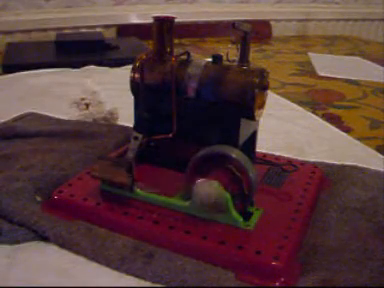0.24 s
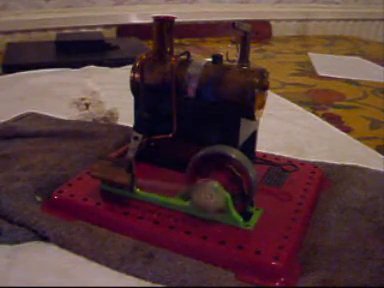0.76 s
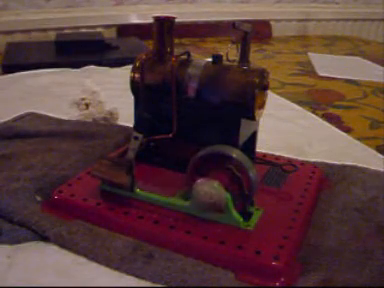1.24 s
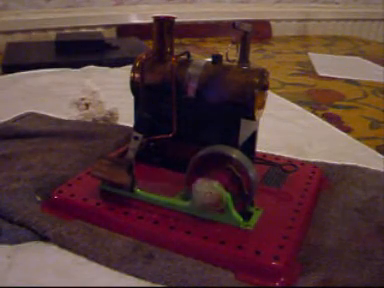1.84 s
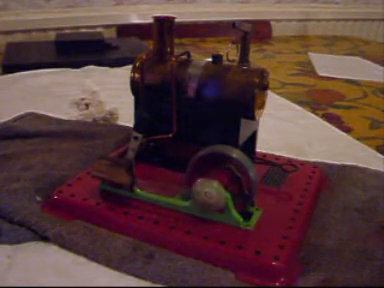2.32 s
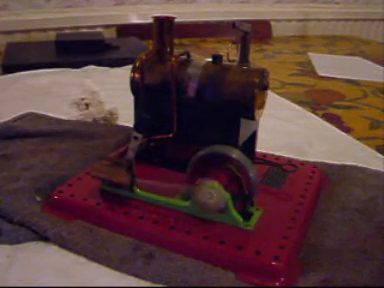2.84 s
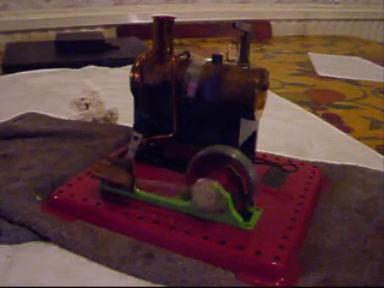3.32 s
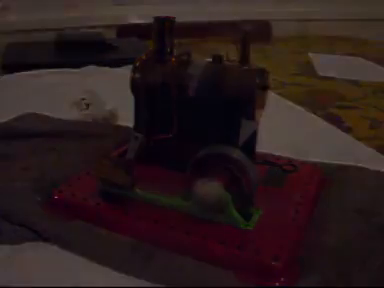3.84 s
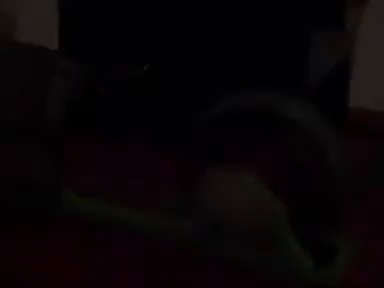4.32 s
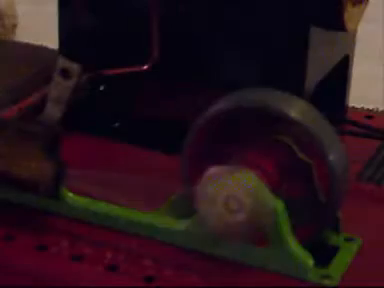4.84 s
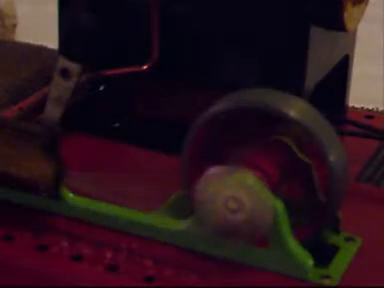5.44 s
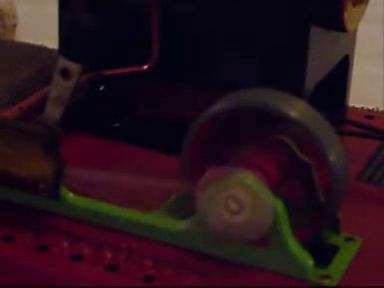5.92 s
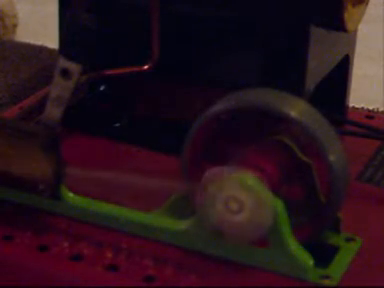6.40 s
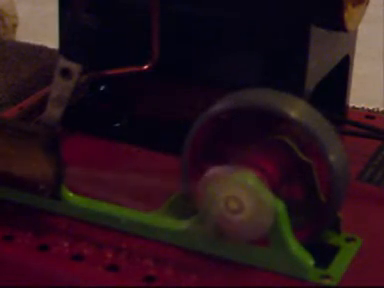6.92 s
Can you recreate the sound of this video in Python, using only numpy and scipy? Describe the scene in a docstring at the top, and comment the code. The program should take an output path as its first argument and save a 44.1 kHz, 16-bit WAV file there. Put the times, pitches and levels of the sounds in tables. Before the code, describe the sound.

Rapid metallic rattling and pulsing steam from a model engine indoors, gathering speed, fading out, then returning close up with a brighter, humming whirr.

```python
"""A toy steam engine with an oscillating cylinder runs on its tin base on a table in a living room.
First, from a step away, it gathers speed from 20 to 29 turns a second and fades out.
Then it fades in again close up, quickening from 35 to 36 turns a second.
On every turn filtered clicks make the knocks and piston ticks, sparse random touches make the rattle,
and gated noise makes the puffs, leak and spit of steam; the frame drones and the room rumbles beneath."""
import sys
import numpy as np
from scipy import signal
from scipy.fft import rfft, irfft, next_fast_len
from scipy.io import wavfile

SR = 44100
rng = np.random.default_rng(int(sys.argv[2]) if len(sys.argv) > 2 else 0)


def to_wav(s):
    """Save 16-bit WAV."""
    ch = np.atleast_2d(s).T  # columns
    pcm = np.round(np.clip(ch, -1, 1) * 32767)  # PCM
    wavfile.write(sys.argv[1], SR, pcm.astype(np.int16))


N = 316197
SECOND_RUN_S = 4.32
# how far play in the joints stretches scatter and rattle at steady speed (factor)
STEADY_SLACK = 0.48

# Ringing of the base plate, frame and boiler.
# Each row: frequency in Hz, width in Hz, lift in dB (negative for a dip).
METAL_MODES = [(141.5, 3.6, 5), (207, 26, 7.5), (235, 5.6, 9), (314.6, 5.5, 13.5), (388.4, 9.9, 7),
               (439, 21, 3.5), (473, 4.8, 7.5), (535.5, 31, 7.5), (696, 73, 10.5), (841, 18, 6.5),
               (916, 18, -6), (1257, 18, 4), (1230, 55, 7), (1390, 30, 6), (1720, 31, 3.5), (1705, 33, -6),
               (1982, 39, 7.5), (2098, 87, 4.5), (2458, 62, 5), (2730, 35, 4), (3046, 78, 6),
               (3420, 50, 4.5), (3720, 40, -2), (3797, 50, 6.5), (4030, 48, -10), (4007, 78, 7.5),
               (4130, 39, 4), (4574, 73, 6), (5197, 65, 12.5), (5800, 380, -5.5), (6580, 40, -18.5)]


def from_db(db):
    """Decibels to gain."""
    return 10 ** (np.asarray(db) / 20)


def rms_one(x):
    """Scale to unit power."""
    return x / np.sqrt(np.mean(x ** 2) + 1e-20)


def colour(x, spectrum):
    """Causal (minimum-phase) filter with a broad spectrum, its phase derived from the cepstrum."""
    size = next_fast_len(len(x) + 4096, real=True)
    hz, db = np.transpose(spectrum)
    bins_hz = np.fft.rfftfreq(size, 1 / SR)
    log_gain = np.log(from_db(np.interp(np.log(bins_hz + 1), np.log(hz), db)))
    cepstrum = irfft(log_gain, size)[:size // 2]
    cepstrum[1:] *= 2
    response = np.exp(rfft(cepstrum, size))
    return irfft(rfft(x, size) * response, size)[:len(x)]


def band(x, hz, width):
    """One resonance with unit gain at its peak."""
    return signal.lfilter(*signal.iirpeak(hz, hz / width, fs=SR), x)


def resonate(x, peaks):
    """A chain of resonances, each lifting or dipping its own band."""
    sections = []
    for hz, width, lift_db in peaks:
        r = np.exp(-np.pi * width / SR)
        poles = np.array([1, -2 * r * np.cos(2 * np.pi * hz / SR), r * r])
        added_band = (1 - r * r) / 2 * np.array([1, 0, -1])
        zeros = poles + (from_db(lift_db) - 1) * added_band
        sections.append(np.r_[zeros, poles])
    return signal.sosfilt(sections, x + 1e-18)


def shimmer(x, peaks, vary_db, changes_per_s):
    """The same chain of resonances, struck in ever different places: each lift rises and falls on its own."""
    when = np.arange(len(x)) / SR * changes_per_s
    for hz, width, lift_db in peaks:
        chance = rng.standard_normal(400)
        wander = np.interp(when, np.arange(len(chance)), chance)
        lift = from_db(lift_db + vary_db * wander)
        x = x + (lift - 1) * band(x + 1e-18, hz, width)
    return x


def disperse(x, delay_s):
    """Bending waves cross the plate, treble first (delay_s at 1 kHz): a click becomes a short chirp."""
    size = next_fast_len(len(x) + 4096, real=True)
    hz = np.fft.rfftfreq(size, 1 / SR)
    # this phase gives a delay that falls as the root of frequency
    phase_turns = 2 * delay_s * np.sqrt(1000 * hz)
    return irfft(rfft(x, size) * np.exp(-2j * np.pi * phase_turns), size)[:len(x)]


def crank(speed, start_angle):
    """Turns done at each moment: the running sum of speed in turns per second."""
    return start_angle + np.cumsum(speed) / SR


def strikes(turns, angle, level_db, scatter_s, uneven_db):
    """One click a turn at a crank angle, never quite equal in time or strength."""
    n = len(turns)
    marks = np.arange(-1, turns[-1] + 1) + angle
    due = np.searchsorted(turns, marks)
    early, strong = rng.standard_normal((len(marks), 2)).T
    scatter = np.interp(marks, turns, scatter_s * np.ones(n))
    at = np.round(due + scatter * early * SR).astype(int)
    inside = (due > 0) & (due < n) & (at >= 0) & (at < n)
    level_db = np.interp(marks, turns, level_db * np.ones(n))
    strength = from_db(level_db + uneven_db * strong)
    return np.bincount(at[inside], strength[inside], n)


def warming(t):
    """From a step away, the engine gathers speed; the harder it pulls, the louder and looser it clatters."""
    # Contacts within one turn. Each row: crank angle in turns, relative knock level in dB,
    # relative rattle level in dB, rattle decay in seconds at a slack of one.
    contacts = [(-.049, -2, -1.5, 0.0032), (0, -2, -11, 0.0035), (.035, -7.5, -8.5, 0.0028),
                (0.099, -17.5, -4.5, .001), (.234, -18, -11.5, 0.0017), (0.347, -22, -11, 0.003),
                (0.408, -20.5, -8, 0.0019), (0.623, -9.5, -9.5, .0019), (.663, -13, -5, 0.0057),
                (0.794, -13.5, -20, 0.0033)]
    # Piston ticks and bounces. Each row: crank angle in turns, relative level in dB.
    tick_hits = [(-.044, 0), (.045, -6), (.1, -7), (.67, -12)]
    # Puffs of steam. Each row: crank angle in turns, relative level in dB, rise in turns, fall in turns.
    puffs = [(-.1, 0, 0.054, 0.067), (-.022, 8.5, 0.027, 0.029), (.06, 2.5, 0.066, 0.083),
             (.125, 0, 0.027, 0.042), (.3, -1.5, 0.05, 0.022), (.41, 0, .06, 0.029),
             (.679, 7, 0.062, 0.049)]
    # Mix of knock, rattle and steam, one row for each: level in dB,
    # dB more per turn/s^2 of pick-up, dB lost per second as the pressure sinks.
    layer_levels = [(-31.5, 1.1245, 1.94), (-25, 0.1346, 0.52), (-28.5, 0.56, -0.17)]
    # Swell and ease of knock, rattle and steam together. Each row: time in seconds, change in dB.
    swell = [(0, 2.5), (.1, -3.5), (.22, -1.8), (.45, -1.9), (.68, 0.3), (.88, -1.4), (1.25, -0.55),
             (1.75, 1.2), (2.05, 0.2), (2.25, 1.5), (2.6, 0), (3.4, -0.6), (3.8, 0)]
    # Broad colour of knocks from afar. Each row: frequency in Hz, relative level in dB.
    far_colour = [(40, -39), (100, -29.5), (200, -12.5), (320, -6), (430, -7), (550, -8.5), (720, 1.5),
                  (920, -6), (1250, -9), (1600, -13), (2100, -9), (3200, -20), (7000, -31)]

    # the flywheel gathers speed along an S-curve, then creeps on (turns per s)
    start_speed, settled_speed, creep_per_s = 20.3893, 27.8646, .2376
    spin_up_s, spin_up_shape = .7076, 1.5007
    lacking = np.exp(-(t / spin_up_s) ** spin_up_shape)
    speed = settled_speed - (settled_speed - start_speed) * lacking + creep_per_s * t
    turns = crank(speed, start_angle=-.21)

    # the joints feel a change of pick-up 27 ms later
    pickup = np.interp(t - .027, t, np.gradient(speed) * SR)
    slack = STEADY_SLACK + .19 * pickup
    swell_db = np.interp(t, *np.transpose(swell))
    knock_db, rattle_db, steam_db = (db + pull * pickup - sag * t + swell_db
                                     for db, pull, sag in layer_levels)

    thump = from_db(knock_db) * knocks(turns, slack, contacts, far_colour, scatter_s=.00008, uneven_db=1.1)
    clatter = from_db(rattle_db) * rattle(turns, slack, contacts, scatter_s=.0002, uneven_db=.9,
                                          rub_db=-13.5, touches_per_s=22000)
    hiss = from_db(steam_db) * steam(turns, puffs, uneven_db=.7, wander_turns=.006)
    piston = from_db(-29.3) * ticks(t, turns, tick_hits, scatter_s=.0001, uneven_db=1.6)
    port = from_db(-37.5) * spits(turns, angle=-.08, length=.045, uneven_db=4)
    return room(thump + clatter + hiss + piston + port) + drone(turns, speed, near=False)


def racing(t):
    """Close up and faster, it runs more evenly, rattles more thinly and drones."""
    # Contacts within one turn. Each row: crank angle in turns, relative knock level in dB before the spurt,
    # relative rattle level in dB, rattle decay in seconds at a slack of one.
    contacts = [(-.06, 4, -7, .0017), (0.023, -5.5, -6, .002), (.072, 4, -9.5, .0012),
                (0.198, -6, -20, .002), (0.353, -3, -11, .001), (.4, -25.5, -16, .001),
                (.583, -7, -11, .002), (0.661, -.5, -15, .0026), (0.844, -9.5, -16, .0025)]
    # Change of each contact's knock in the spurt of speed, in dB.
    spurt_change_db = [2, 9, 0, -3.5, 1, -3, -1.5, -5, 1.5]
    # Piston ticks and bounces. Each row: crank angle in turns, relative level in dB.
    tick_hits = [(-.064, 0), (.03, -10), (.085, -10), (.565, -9)]
    # Puffs of steam. Each row: crank angle in turns, relative level in dB, rise in turns, fall in turns.
    puffs = [(-.125, 0, 0.023, 0.054), (-.03, 8, 0.021, .033), (.08, 4, 0.072, 0.076),
             (.38, -0.5, 0.058, 0.065), (.59, -3.5, .025, .05), (.67, 2.5, 0.093, 0.1)]
    # Speed with its small spurt. Each row: time in seconds, speed in turns per second.
    speed_curve = [(5.2, 35.18), (5.7, 35.26), (6.02, 35.26), (6.38, 35.87)]
    # Broad colour of knocks from close by. Each row: frequency in Hz, relative level in dB.
    near_colour = [(40, -20.5), (100, -16.5), (200, -19.5), (430, -0.5), (720, -10), (920, -6), (1250, -7),
                   (1600, 1.5), (2100, -4), (3200, -5.5), (7000, -24.5)]

    speed = np.interp(t, *np.transpose(speed_curve))
    turns = crank(speed, start_angle=-.186)
    # the balance of the knocks switches at 5.8 s
    spurt = (t > 5.8).astype(float)
    spurt_contacts = [(angle, db + change * spurt, *rest)
                      for (angle, db, *rest), change in zip(contacts, spurt_change_db)]

    thump = from_db(-35) * knocks(turns, STEADY_SLACK, spurt_contacts, near_colour,
                                  scatter_s=.00004, uneven_db=.8)
    clatter = from_db(-25.5) * rattle(turns, STEADY_SLACK, contacts, scatter_s=.00022, uneven_db=.7,
                                      rub_db=-11, touches_per_s=20000)
    # a gentle low cut thins the rattle
    clatter = signal.sosfilt(signal.butter(1, 850, "high", fs=SR, output="sos"), clatter)
    hiss = from_db(-26) * steam(turns, puffs, uneven_db=.5, wander_turns=.007)
    piston = from_db(-27.2) * ticks(t, turns, tick_hits, scatter_s=.00007, uneven_db=1.2)
    port = from_db(-36) * spits(turns, angle=-.09, length=.04, uneven_db=2)
    return room(thump + clatter + hiss + piston + port) + drone(turns, speed, near=True)


def knocks(turns, slack, contacts, spectrum, scatter_s, uneven_db):
    """The load reverses in the bearings and thumps the plate, so alike each turn that it hums in lines."""
    blows = sum(strikes(turns, angle, db, scatter_s * slack, uneven_db) for angle, db, _, _ in contacts)
    chirps = disperse(blows, delay_s=0.001454)
    return rms_one(resonate(colour(chirps, spectrum), METAL_MODES))


def rattle(turns, slack, contacts, scatter_s, uneven_db, rub_db, touches_per_s):
    """Each contact chatters out in a dying shower of tiny touches; the piston rubs in between."""
    # Broad colour of the touches. Each row: frequency in Hz, relative level in dB.
    touch_colour = [(80, -23.5), (300, -20), (520, -7), (750, -6), (1020, -5.5), (1450, -0.5), (2200, -0.5),
                    (2820, -6.5), (3500, 0), (4450, 1), (4900, -2), (5600, -6), (7100, -0.5), (8000, -18)]
    now = np.arange(len(turns))
    power = from_db(rub_db) ** 2
    for angle, _, db, decay_s in contacts:
        blows = strikes(turns, angle, db, scatter_s * slack, uneven_db)
        last = np.maximum.accumulate(np.where(blows > 0, now, 0))
        # no shower dies faster than 2 ms
        dying = np.exp((last - now) / SR / np.maximum(decay_s * slack, .002))
        power = power + (blows[last] * dying) ** 2
    touches = (rng.random(len(now)) < touches_per_s / SR) * rng.standard_normal(len(now))
    shower = colour(touches * np.sqrt(power), touch_colour)
    return rms_one(shimmer(shower, METAL_MODES, vary_db=1.6, changes_per_s=18))


def steam(turns, puffs, uneven_db, wander_turns):
    """The rocking cylinder opens and shuts the port: uneven puffs of noise swell and die over a steady leak."""
    # Broad colour of the steam. Each row: frequency in Hz, relative level in dB.
    steam_colour = [(100, -35.5), (900, -9.5), (2600, -11), (4000, -7), (4900, -6), (5600, -1), (6300, -3),
                    (7100, -6.5), (7700, -11), (8200, -33.5)]
    # Resonances of the port. Each row: frequency in Hz, width in Hz, lift in dB.
    port_modes = [(5360, 97, 3), (6036, 190, 8), (6360, 110, -0.5), (6730, 70, 4)]
    leak_db = -9
    # strength and timing wander with a new value every quarter turn
    marks = np.arange(-1, turns[-1] + 1, 1 / 4)
    strong, late = (np.interp(turns, marks, c) for c in rng.standard_normal((len(marks), 2)).T)
    power = from_db(leak_db) ** 2
    for angle, db, rise, fall in puffs:
        past = (turns + wander_turns * late - angle + .5) % 1 - .5
        puff = from_db(db) * np.exp(np.minimum(past / rise, -past / fall))
        power = power + puff ** 2
    opening = np.sqrt(power) * from_db(uneven_db * strong)
    noise = opening * rng.standard_normal(len(turns))
    return rms_one(resonate(colour(noise, steam_colour), port_modes))


def ticks(t, turns, hits, scatter_s, uneven_db):
    """The piston takes up its play on the same spot each turn: a crisp, bright tick that bounces."""
    # Ringing of piston and cylinder. Each row: frequency in Hz, width in Hz, relative level in dB.
    piston_modes = [(2050, 200, -7), (3480, 200, -4), (3950, 220, -2.5), (4600, 220, -3), (5220, 200, -6),
                    (6150, 380, 6), (7000, 300, -5)]
    # Turns that tick harder than the rest. Each row: time in seconds, dB more.
    hard_turns = [(1.565, 3), (1.672, 3), (1.815, 3), (2.097, 3), (2.696, 4), (2.766, 3), (2.941, 3),
                  (5.718, 2), (5.83, 2.5), (5.887, 2.5), (5.944, 2.5), (6.114, 3.5), (6.645, 2.5),
                  (7.063, 2.5)]
    hard_s = .01
    clicks = sum(strikes(turns, angle, db, scatter_s, uneven_db) for angle, db in hits)
    # neighbouring modes ring with opposite sign
    bright = sum((-1) ** k * from_db(db) * band(clicks + 1e-18, hz, width)
                 for k, (hz, width, db) in enumerate(piston_modes))
    hard_db = sum(db * np.exp(-((t - s) / hard_s) ** 2) for s, db in hard_turns)
    return rms_one(disperse(bright, delay_s=.0015)) * from_db(hard_db)


def spits(turns, angle, length, uneven_db):
    """Just before the tick, steam squeezes through the barely open port with a brief, uneven whistle."""
    turn = np.floor(turns - angle + .5).astype(int)
    chance = np.clip(rng.standard_normal(turn.max() + 2), -2, 2)
    strong = from_db(uneven_db * chance)[turn]
    gate = np.exp(-((turns - angle - turn) / length) ** 2)
    whistle = band(rng.standard_normal(len(turns)), hz=6120, width=160)
    return rms_one(strong * gate * whistle)


def drone(turns, speed, near):
    """Every turn jolts the frame; a multiple of the turning rate sings out while it lies on a resonance."""
    # Narrow resonances of the frame. Each row: frequency in Hz, width in Hz of each of two equal filters,
    # level in dB of a multiple on the peak from afar, the same from close by.
    frame_modes = [(145, 13, -68, -59.5), (215.4, 13, -67, -60.5), (245.1, 12, -56, -54),
                   (312.6, 8.0, -52.6, -44.5), (371.8, 16, -68.5, -39.5), (395.7, 12, -48, -63.8),
                   (429.7, 20, -69.5, -43.5), (462, 19, -52.5, -45), (496.6, 24.0, -48.5, -41.5),
                   (509, 11, -54, -72), (539, 15, -56, -52), (564.5, 56, -69.1, -45.5),
                   (620.3, 22, -47, -60), (676, 28, -61.5, -36.1), (709.7, 12.7, -44, -34),
                   (772, 19, -64, -50.6), (811, 29, -53.6, -49.5), (863.3, 12, -59.5, -38.5),
                   (995.2, 50.0, -47, -54), (1099, 27, -59.3, -54.5), (1176, 30.0, -53.5, -36),
                   (1213, 38, -51, -36), (1288, 20, -62, -49.5), (1372, 30.0, -54, -51.5),
                   (1730, 26.0, -66, -41.5), (1970, 43, -49.5, -41.5), (2040, 21.0, -56, -52.7)]
    jolt_angle = .0906 if near else -.0064
    done = np.floor(turns - jolt_angle)
    # scaled so that every multiple of the turning rate has unit amplitude
    jolts = np.diff(done, prepend=done[0]) * SR / (2 * speed) + 1e-18
    out = 0
    for hz, width, far_db, near_db in frame_modes:
        peak = np.concatenate(signal.iirpeak(hz, hz / width, fs=SR))
        out = out + from_db(near_db if near else far_db) * signal.sosfilt([peak, peak], jolts)
    return out


def room(x):
    """The short diffuse echo of a furnished room, as decaying noise; cloth swallows its treble."""
    t60_s, wet_db = .28, -10.5
    t = np.arange(SR // 2) / SR
    # the echo starts after 5 ms
    echo = rng.standard_normal(len(t)) * from_db(-60 * t / t60_s) * (t > .005)
    echo = echo / np.linalg.norm(echo)
    echo = signal.sosfilt(signal.butter(1, 2500, fs=SR, output="sos"), echo)
    return x + from_db(wet_db) * signal.fftconvolve(x, echo)[:len(x)]


def room_rumble():
    """The low rumble of the room: steady noise weighted to the bass."""
    # Broad colour of the rumble. Each row: frequency in Hz, relative level in dB.
    rumble_colour = [(25, -0.5), (60, -7.5), (140, -3.5), (400, -11), (2000, -27.5), (8000, -45.5)]
    return from_db(-58.5) * rms_one(colour(rng.standard_normal(N), rumble_colour))


def scene():
    """The two runs one after the other, over the low rumble of the room; one microphone feeds both channels."""
    t = np.arange(N) / SR
    second = t >= SECOND_RUN_S
    engine = np.concatenate([warming(t[~second]), racing(t[second])])
    return np.tile(engine + room_rumble(), (2, 1))


def record(dry):
    """The microphone rounds peaks and its band is narrow; the sound fades through silence between the runs."""
    overload, cutoff_hz = .68, 7900
    rounded = dry / (1 + (dry / overload) ** 4) ** .25
    t = np.arange(N) / SR
    fade_out = np.interp(t, [2.55, 4.325], [1, 0]) * (t < 4.3)
    fade_in = np.interp(t, [4.325, 6.25], [0, 1]) * (t > 4.338)
    faded = rounded * (fade_out + fade_in)
    return signal.sosfilt(signal.cheby1(14, .2, cutoff_hz, fs=SR, output="sos"), faded)


dry = scene()
out = record(dry)
to_wav(out)
```